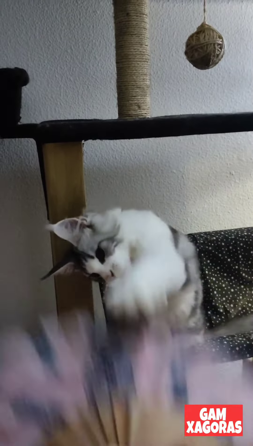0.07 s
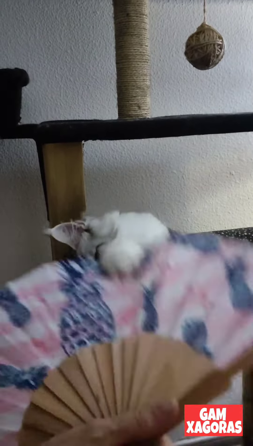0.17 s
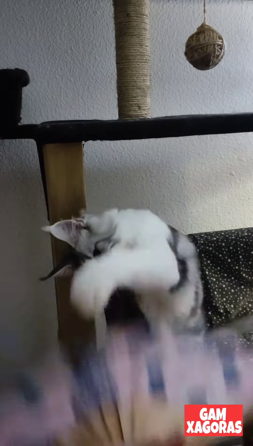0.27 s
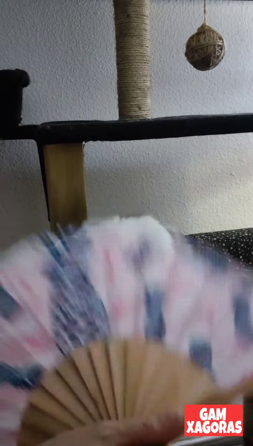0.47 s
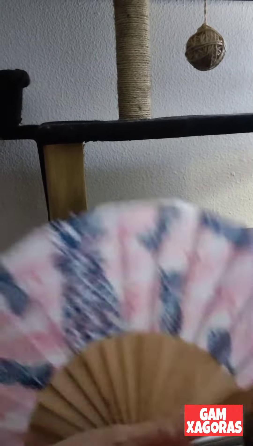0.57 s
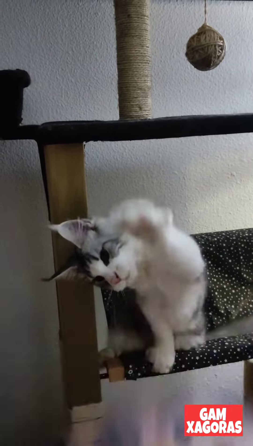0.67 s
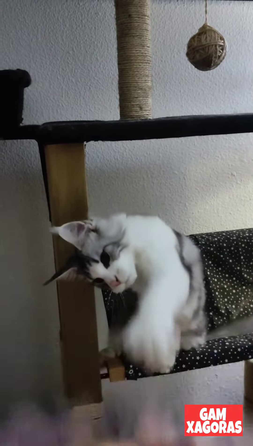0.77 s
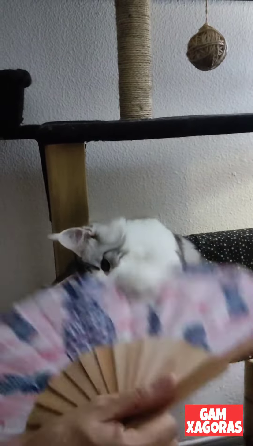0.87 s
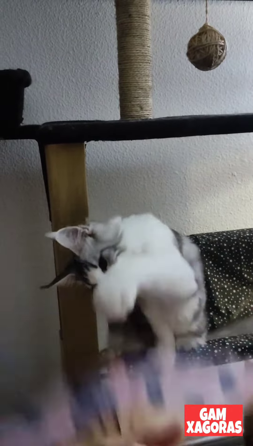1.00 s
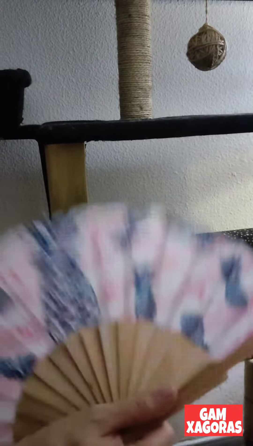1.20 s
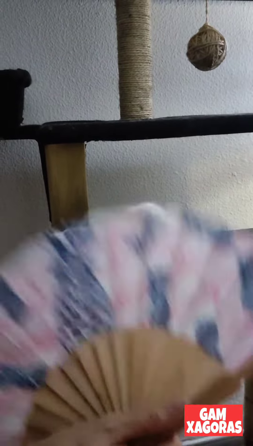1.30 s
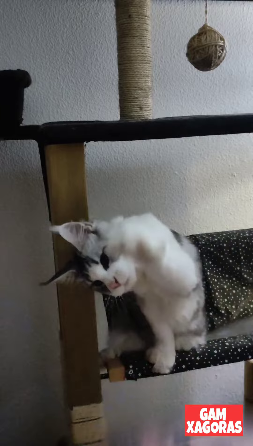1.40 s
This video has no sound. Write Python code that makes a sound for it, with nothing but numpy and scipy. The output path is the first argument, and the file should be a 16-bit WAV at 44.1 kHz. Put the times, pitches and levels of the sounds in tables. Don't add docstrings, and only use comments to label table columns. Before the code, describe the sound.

A folding hand fan is flicked close to a phone in a small quiet room. After faint handling, a loud crack at 0.2 s brings knocking slats and a low cloth boom. Soft ticks and knocks follow from 0.35 to 0.9 s. A bright, sharp snap hits at 0.95 s, then a quieter clack with rustling around 1.27-1.43 s. Short echoes fade into low, faint room hum.

```python
import sys
import numpy as np
from scipy import signal
from scipy.fft import rfft, irfft, next_fast_len
from scipy.io import wavfile
from scipy.ndimage import uniform_filter1d

SR = 44100
rng = np.random.default_rng(int(sys.argv[2]) if len(sys.argv) > 2 else 0)


def boost_factor(decibels):
    exponent = np.asarray(decibels, float) / 20
    return 10 ** exponent


def waveform_to_disk(signal):
    frames = np.transpose(np.atleast_2d(signal))
    scaled = np.clip(frames, -1, 1) * 32767
    samples = np.round(scaled).astype(np.int16)
    wavfile.write(sys.argv[1], SR, samples)


N = 63945


def at(table, hz):
    table_hz, value = np.array(table).T
    return np.interp(np.log(np.maximum(hz, 1)), np.log(table_hz), value)


def colour(x, db):
    return irfft(rfft(x) * boost_factor(db), x.shape[-1])


def decay(t, t60_s):
    return np.exp(-np.log(1000) * t / t60_s)


def band_window(f, hz):
    return np.exp(-(np.log2(f / hz) / 0.35) ** 2)


def walk(rate_hz):
    k = int(SR / rate_hz)
    steps = np.repeat(rng.standard_normal(N // k + 1), k)
    return 1.3 * uniform_filter1d(uniform_filter1d(steps, k), k)[:N]


def add(out, x, start_s, pan_db):
    both = x * np.ones((2, 1))
    for side, lag_samples, pan in ((0, 4, 0.21), (1, 0, -0.77)):
        i = max(int(start_s * SR), 0) + lag_samples
        out[side, i:i + x.shape[-1]] += boost_factor(pan * pan_db) * both[side, :N - i]


# frequency in Hz, likeness 0-1.
LIKENESS = [(100, .98), (300, .94), (700, .6), (2000, .05), (8000, .05), (14000, .1)]


def band_pair(hz, size):
    fast = next_fast_len(size, True)
    f = np.fft.rfftfreq(fast, 1 / SR) + 1e-9
    bins = rng.standard_normal((2, len(f), 2)) @ np.array([1, 1j])
    x = irfft(bins * band_window(f, hz), fast)[:, :size]
    x = x / x.std(axis=1, keepdims=True)
    like = np.clip(at(LIKENESS, hz), 0, 1)
    mid = x[0] * np.sqrt((1 + like) / 2)
    side = x[1] * np.sqrt((1 - like) / 2)
    return np.array([mid + side, mid - side])


# frequency in Hz, density in dB per Hz.
HUM_SPECTRUM = [(15, -45), (60, -3), (110, 0), (416, -2.5), (550, -8), (2220, -19.5), (10000, -30),
                (14400, -38), (16000, -20)]
HUM_DB, SWELL_DB, FLICKER_DB = -61, 0.7, 1.2
BANDS_HZ = 30 * 2 ** np.arange(0, 9.3, 0.5)


def hum():
    swell = walk(3)
    out = np.zeros((2, N))
    for hz in BANDS_HZ:
        band = band_pair(hz, N) * np.sqrt(hz)
        out += band * boost_factor(at(HUM_SPECTRUM, hz) + SWELL_DB * swell + FLICKER_DB * walk(12.73))
    return out * boost_factor(HUM_DB) / out.std()


# frequency in Hz, t60 in seconds.
ROOM_T60 = [(100, 0.36), (400, 0.51), (1500, 0.43), (5000, 0.3), (12000, 0.41)]
# frequency in Hz, level in dB.
ROOM_DB = [(100, -12), (200, -11), (400, -7.5), (1500, -5.5), (5000, 5), (12000, -7.5)]
FIRST_ECHO_MS, PATCHY_DB = 0.74, 2.5
KNOCK_ROOM_DB, CRACK_ROOM_DB = -1.5, 0.5


def room(hits, snaps):
    size = int(0.7 * SR)
    t = np.arange(size) / SR
    f = np.fft.rfftfreq(N, 1 / SR) + 1e-9
    rise = np.clip(t * 1000 / FIRST_ECHO_MS - 1, 0, 1)
    snap_spectrum = rfft(snaps.mean(axis=0))
    tail, hiss = 0, 0
    for hz in BANDS_HZ:
        fade = decay(t, at(ROOM_T60, hz))
        fade = fade * rise * boost_factor(at(ROOM_DB, hz)) / np.sqrt((fade ** 2).sum())
        tail = tail + band_pair(hz, size) * fade * np.sqrt(hz / SR)
        power = irfft(snap_spectrum * band_window(f, hz), N) ** 2
        envelope = np.sqrt(np.abs(signal.fftconvolve(power, fade ** 2)[:N]))
        hiss = hiss + band_pair(hz, N) * boost_factor(PATCHY_DB * walk(60.06)) * envelope
    echo = signal.fftconvolve(hits.mean(axis=0)[None], tail, axes=1)[:, :N]
    return boost_factor(KNOCK_ROOM_DB) * echo + boost_factor(CRACK_ROOM_DB) * hiss


# frequency in Hz, level in dB.
CRACK_COLOUR = [(500, 7), (1500, 5), (4500, 3), (6800, -4), (8600, 6), (10800, 0.5), (12600, 3),
                (16000, -6)]
CRACK_LIKENESS, CRACK_RISE_MS, GRIT_DB = 0.29, 0.058, 2


def cloth_bursts(table):
    t = np.arange(8192) / SR
    lead_s = 0.002
    late_ms = np.maximum(t - lead_s, 0) * 1000
    octaves = np.log2(np.clip(np.fft.rfftfreq(len(t), 1 / SR), 700, None) / 5000)
    out = np.zeros((2, N))
    for start_s, db, length_ms, tilt_db in table:
        grit = rng.standard_normal((4, len(t)))
        shape = (1 - np.exp(-late_ms / CRACK_RISE_MS)) * np.exp(-late_ms / length_ms)
        grain = np.sqrt(CRACK_LIKENESS) * grit[0] + np.sqrt(1 - CRACK_LIKENESS) * grit[1:3]
        burst = grain * boost_factor(GRIT_DB * grit[3]) * shape
        burst = burst * np.sqrt((shape ** 2).sum() / (burst ** 2).sum(axis=1, keepdims=True))
        add(out, boost_factor(db) * colour(burst, tilt_db * octaves), start_s - lead_s, 0)
    return colour(out, at(CRACK_COLOUR, np.fft.rfftfreq(N, 1 / SR)))


# start in seconds, level in dB, length in ms,
# brightness in dB per octave.
RUSTLES = [(.0020, -74, 110, 0.5), (.0300, -74.5, 12, -9.5), (.1190, -58.5, 11.7, -3.5),
           (.3750, -59.5, 17.4, -5.5), (.4970, -64, 6.4, -4), (.6845, -62.5, 0.77, -11),
           (.7025, -59, 2, -9), (.7415, -63, 2.5, -10.5), (.7840, -57.5, 1.3, -6),
           (.8660, -57.5, 5.4, -3.5), (.8770, -63.5, 12, -5.5), (1.1930, -64.5, 12, -6.5),
           (1.2910, -55, 41, -2.5), (1.3030, -55.5, 38, -1.5), (1.3400, -61.5, 13, 1),
           (1.3670, -65, 10.7, -8), (1.4225, -62.5, 11, -5)]


def rustles():
    return cloth_bursts(RUSTLES)


# start in seconds, level in dB, pitch in Hz, t60 in seconds.
RINGS = [(.001, -52.5, 350, 0.17), (.030, -65, 1040, 0.034), (.068, -54.5, 685, 0.061),
         (0.094, -57, 112, 0.11), (.122, -57, 618, 0.16), (0.129, -63.5, 1072, 0.17),
         (.208, -27, 527, 0.094), (.210, -34, 795, 0.064), (.233, -34, 345, 0.11), (.232, -42, 119.5, 0.23),
         (.250, -42, 470, 0.14), (.288, -39.5, 409.5, 0.17), (0.344, -51, 113, 0.13),
         (0.334, -53, 393, 0.091), (.360, -48.5, 381, .15), (.685, -53, 970, 0.027),
         (0.704, -54.5, 953, 0.056), (.704, -49, 368, 0.075), (0.715, -52, 385, 0.11),
         (0.743, -51, 378, 0.065), (.868, -54, 670, 0.063), (0.718, -57, 950, 0.025),
         (0.741, -43.5, 1450, 0.021), (.745, -44, 627, .04), (0.784, -58, 990, 0.026),
         (.946, -27.5, 692, 0.051), (.953, -53, 1035, 0.45), (0.971, -48, 1758, 0.24),
         (.962, -44, 610, .07), (.975, -37, 337.4, 0.1), (.984, -41, 465.5, 0.13), (1.000, -41, 137, 0.17),
         (1.025, -49.5, 416, 0.13), (1.039, -49.5, 216, 0.19), (1.274, -42, 940, 0.023),
         (1.305, -43, 95, 0.1), (1.316, -54, 1650, .05), (1.292, -45.5, 358.8, 0.22),
         (1.421, -46.5, 880, 0.036), (1.424, -44, 612, 0.064), (1.424, -54, 1450, 0.058),
         (1.435, -57, 352, 0.04)]
RING_RISE_CYCLES = 1.36
SLAT_PAN_DB = 0.6


def rings():
    t = np.arange(16384) / SR
    out = np.zeros((2, N))
    for start_s, db, hz, t60_s in RINGS:
        swell = (1 - np.exp(-t * hz / RING_RISE_CYCLES)) * decay(t, t60_s)
        add(out, boost_factor(db) * swell * np.sin(2 * np.pi * hz * t), start_s, SLAT_PAN_DB)
    return out


# start in seconds, level in dB, pitch in Hz, push in ms.
KNOCKS = [(0.042, -50.5, 370, 0.93), (0.202, -19.5, 124.6, 6.6), (0.2065, -29.5, 597, 0.12),
          (0.2099, -32.5, 119, 2.2), (0.2091, -18.5, 544, 1.2), (0.2121, -16.5, 396.4, 0.28),
          (0.2161, -20.5, 411, 0.87), (0.29, -64, 410, 0.75), (0.37, -47, 375, 2.1),
          (0.391, -44.5, 390, 1.8), (0.4954, -56, 410, 0.97), (0.579, -59, 82, 5.4),
          (0.6861, -42.5, 372, 0.78), (0.7034, -44.5, 385, 0.36), (0.722, -54, 396, 1.1),
          (0.743, -54.5, 390, 2.7), (0.7865, -83, 590, 0.35), (0.869, -49, 665, 0.74),
          (1.092, -45.5, 384, 0.53), (1.192, -70, 436, 0.66), (1.273, -45.5, 450, 0.24),
          (1.283, -44, 252, 1.5), (1.3160, -41.5, 377, 0.26), (1.3196, -39.5, 670, 0.38),
          (1.331, -49.5, 147, 3.3), (1.3670, -52.5, 380, 0.32), (1.4231, -52.5, 620, 0.3),
          (1.43, -44.5, 940, 0.29)]
# start in seconds, level in dB, pitch in Hz, push in ms.
KNOCKS_AWAY = [
    (0.9467, -29.5, 425, 1.1),
    (0.9508, -33, 750, 0.22),
    (0.9559, -36.5, 345, 0.65),
    (.9560, -31.5, 670, 0.62),
    (.9660, -31.5, 205, 0.81),
    (1.2690, -55.5, 128, 1.7),
    (1.2790, -39.5, 367, 0.54),
]
# frequency in Hz, level in dB, t60 in seconds.
BODY = [(125.8, -29, 0.31), (205, -12, 0.11), (275, -26.5, 0.28), (345, -21.5, 0.081), (396.4, -13.5, 0.13),
        (437, -19.5, 0.099), (613, -16, 0.062), (827, -15, 0.028), (1013, -18.5, 0.047), (1264, -7, 0.02),
        (1701, -14.5, 0.055), (2500, -34, 0.04), (3500, -43, 0.012)]
KNOCK_T60_CYCLES, BODY_SCATTER_DB = 13, 3


def knocks():
    t = np.arange(8192) / SR
    body_hz, body_db, body_t60 = np.array(BODY).T[:, :, None]

    def ring(hz, t60_s):
        return np.sin(2 * np.pi * hz * t) * decay(t, t60_s)

    out = np.zeros((2, N))
    for polarity, table in ((1, KNOCKS), (-1, KNOCKS_AWAY)):
        for start_s, db, hz, push_ms in table:
            scatter = rng.standard_normal((2, len(BODY), 1))
            slat = ring(hz, KNOCK_T60_CYCLES / hz)
            modes = ring(body_hz * (1 + 0.02 * scatter[1]), body_t60)
            body = (boost_factor(body_db + BODY_SCATTER_DB * scatter[0]) * modes).sum(axis=0)
            push = t[:512] * np.exp(-t[:512] * 5000 / push_ms)
            knock = signal.fftconvolve(slat + body, push / push.sum())
            add(out, polarity * boost_factor(db) * knock, start_s, SLAT_PAN_DB)
    return out


# start in seconds, level in dB, length in ms, brightness in dB per octave.
CRACKS = [(0.2051, -52, 1.2, 0), (0.208, -34, 1.7, 0), (0.2095, -20.5, 0.65, 1), (0.2107, -17.5, 0.92, -2),
          (0.2143, -29, 2.7, 2), (.2150, -20, .6, 1.5), (.2196, -29, 1, 3), (0.227, -31, 2.3, -0.5),
          (.2400, -42, 7.9, 4), (.2540, -47.5, 32, .8), (0.942, -57, 6.2, -3.5), (0.9485, -30, 0.56, 6),
          (.9498, -13, .3, 5), (0.9507, -24.5, 0.71, 1.5), (.9533, -34, 1.7, -3), (.9583, -45, 0.66, -6),
          (0.9603, -27, 1.3, 2), (.9611, -24, .35, -1), (.9700, -38.5, 16.7, -1.6), (.9765, -42, 1.2, 6),
          (1.2774, -52.5, 1.2, -8), (1.2771, -37.5, 1.75, 4.5), (1.287, -45, 0.95, -3.5),
          (1.2857, -49, 2.6, 6.5), (1.3162, -44, 2.5, -1)]


def cracks():
    return cloth_bursts(CRACKS)


# frequency in Hz, left minus right in dB.
PORTS = [(100, 0.5), (350, 1.3), (700, 0.5), (1300, 1.5), (2400, -2.5), (4500, 13.5), (8000, 13),
         (13000, -6.5)]


def scene():
    tone = hum()
    hits = knocks()
    snaps = cracks() + rustles()
    ports_db = at(PORTS, np.fft.rfftfreq(N, 1 / SR)) * np.array([[0.5], [-0.5]])
    return colour(hits + snaps + rings(), ports_db) + room(hits, snaps) + tone


def band_limit(x):
    return signal.sosfilt(signal.butter(12, 16650, fs=SR, output="sos"), x)


def record(dry):
    bass_cut = signal.butter(4, 80, "high", fs=SR, output="sos")
    top_cut = signal.ellip(8, 0.3, 40, 15700, fs=SR, output="sos")
    mix = signal.sosfilt(top_cut, signal.sosfilt(bass_cut, dry))
    return band_limit(mix)


dry = scene()
out = record(dry)
waveform_to_disk(out)
```